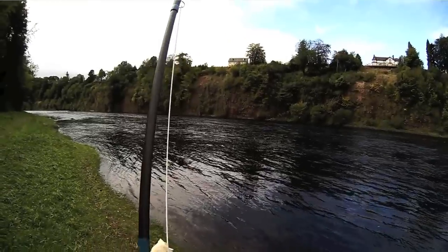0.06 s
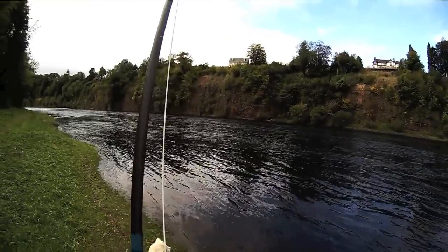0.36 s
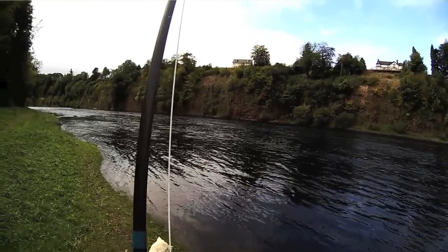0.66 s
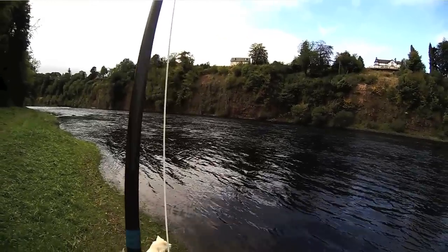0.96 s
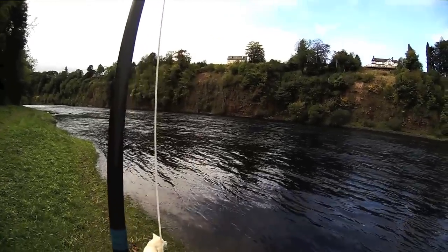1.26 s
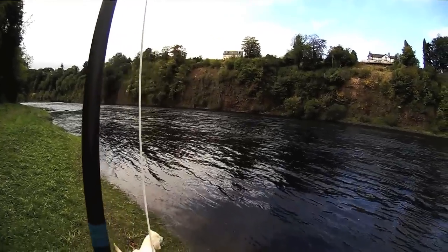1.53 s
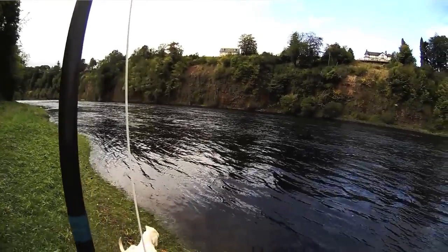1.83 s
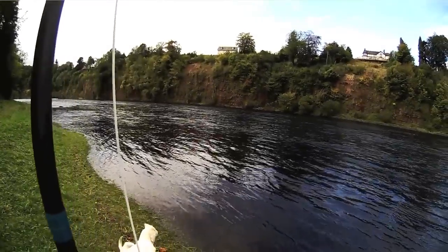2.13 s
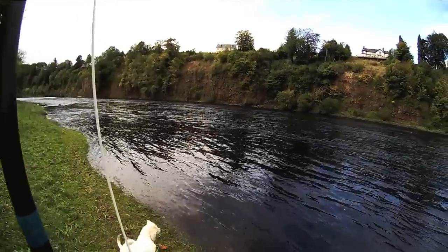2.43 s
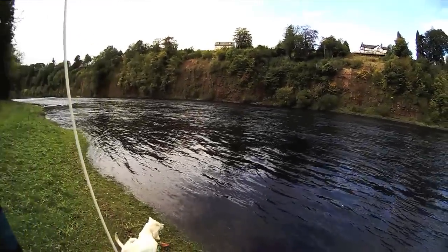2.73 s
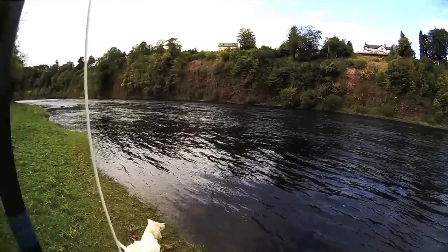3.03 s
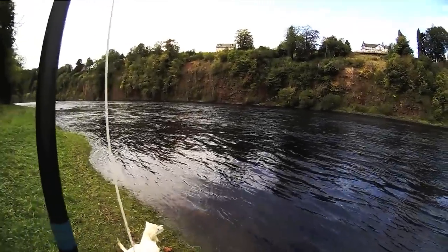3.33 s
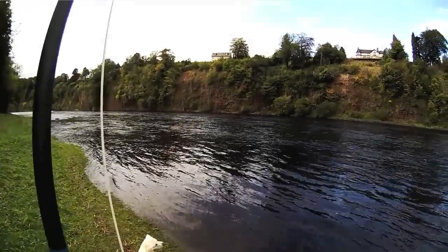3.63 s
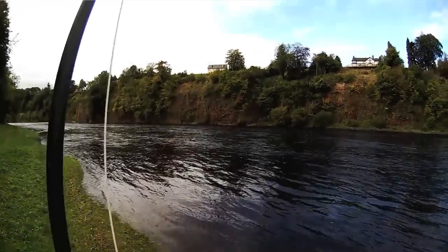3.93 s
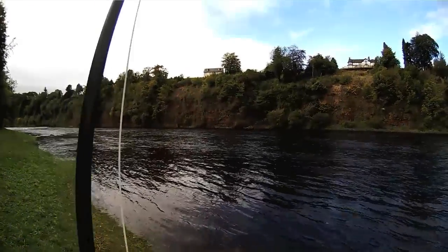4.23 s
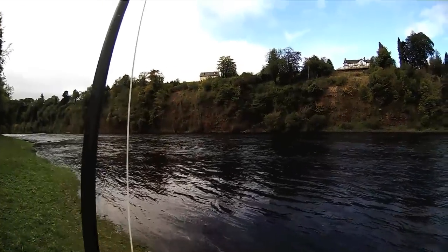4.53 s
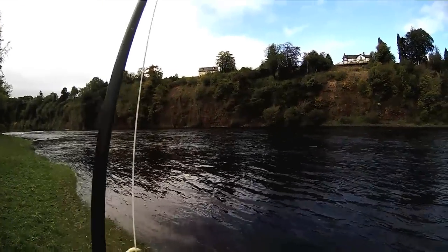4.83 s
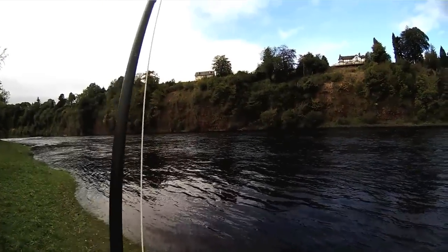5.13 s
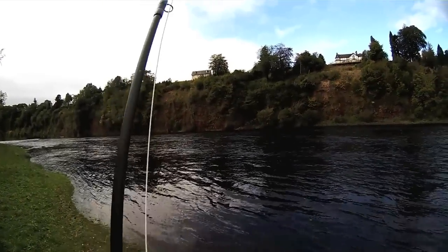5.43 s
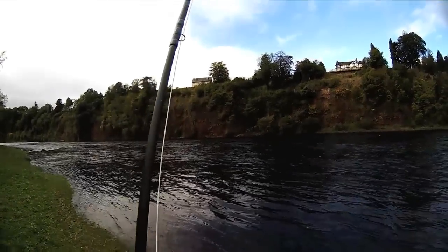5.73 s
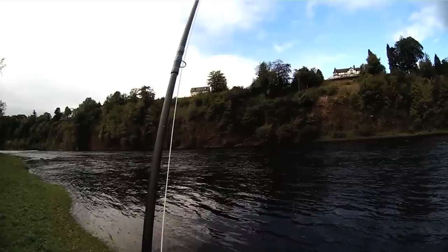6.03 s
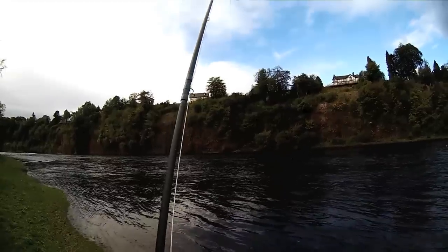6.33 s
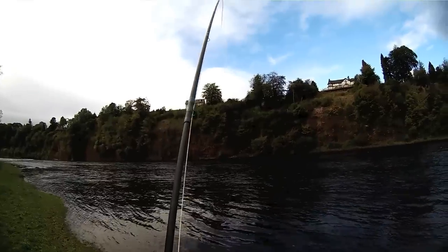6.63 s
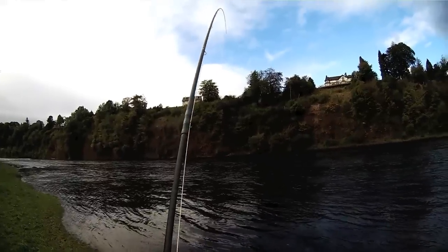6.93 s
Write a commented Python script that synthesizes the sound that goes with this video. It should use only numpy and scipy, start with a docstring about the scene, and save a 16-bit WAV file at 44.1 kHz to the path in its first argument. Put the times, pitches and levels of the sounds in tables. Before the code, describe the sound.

On an open riverbank, uneven gusts buffet the microphone with deep rumbles and thumps, growing heavier toward the end. Close by, a fishing reel is nudged and ticks now and then, before settling into a quick, regular winding with rasping gears, clicks and a thin high note. The current washes quietly behind throughout, with a single bubble and a barely audible distant bird near the start.

```python
"""A fishing reel is wound beside a wide river, starting slowly and settling to a steady pace.
Its gears whirr and rasp once a turn, its pawl (a small catch) clicks, and it sings one thin note.
Swirls of wind rumble, flutter and thump on the microphone, and the strongest overload it.
Behind them the water washes evenly, one bubble plops and a far bird whistles three times."""
import sys
import numpy as np
from scipy import signal
from scipy.fft import rfft, irfft, next_fast_len
from scipy.io import wavfile
from scipy.ndimage import uniform_filter1d

SR = 44100
rng = np.random.default_rng(int(sys.argv[2]) if len(sys.argv) > 2 else 0)


def materialize(psi):
    """Save the field psi as 16-bit PCM at rate SR to the path in sys.argv[1].

    A 1-D psi becomes a single channel; in a 2-D psi each row is a channel.
    """
    bounded = np.clip(np.atleast_2d(psi).T, -1, 1)
    quanta = np.round(bounded * 32767).astype(np.int16)
    wavfile.write(sys.argv[1], SR, quanta)


N = 312228
TIME = np.arange(N) / SR

# Table levels are relative: the functions may add their own gain.
# how loud the reel is: (time [s], rasp [dB], whirr [dB], singing [dB])
REEL_LEVELS = [(0, -60, -74.5, -99.5), (2.9, -55, -91.5, -95.5), (3.3, -53.5, -68.5, -82),
               (3.62, -49, -62.5, -67.5), (4.3, -50.5, -60, -67), (4.75, -48.5, -59.5, -70),
               (4.98, -56.5, -62, -69), (6.1, -52.5, -60, -81), (7.08, -56.5, -58.5, -77)]
# small nudges of the handle before the winding: (time [s], rasp [dB], half length [s])
HANDLE_NUDGES = [(.14, -63, 0.035), (.36, -59, 0.045), (0.982, -61, 0.074), (2.756, -57, 0.017),
                 (3.055, -57, 0.046), (3.176, -56.5, 0.037)]
# tone of the rubbing gears and of the running gears: (frequency [Hz], level [dB])
RASP_SPECTRUM = [(500, -20.5), (1500, -7.5), (2000, -4.5), (3000, -16.5), (4500, -14), (5800, -7),
                 (6500, -6), (8000, -8.5), (10000, -45)]
WHIRR_SPECTRUM = [(300, -8), (900, -3.5), (1400, 0), (1750, -0.5), (2030, 1.5), (2400, -7), (3300, -11.5),
                  (5000, -16), (8000, -8.5), (10000, -53)]
# the main pawl clicks: (time [s], click [dB], knock on the housing [dB])
PAWL_CLICKS = [(1.1497, -35.5, -64), (1.249, -50, -50.5), (1.3543, -33, -55), (1.5458, -32.5, -68),
               (1.5947, -36, -71), (2.2175, -25, -55), (2.662, -30, -64), (3.1183, -28.5, -64),
               (3.492, -28.5, -65), (3.919, -44, -45), (4.05, -28, -43.5), (4.2364, -30.5, -67),
               (4.2858, -31, -55), (4.3145, -24, -60), (4.503, -36, -44), (4.7097, -31, -54),
               (4.7618, -30, -53), (4.935, -31.5, -54), (4.992, -23.5, -51), (5.158, -31.5, -46),
               (5.204, -23.5, -60), (5.3162, -31.5, -63), (5.3828, -32, -45), (5.5798, -29.5, -61),
               (5.6152, -26.5, -48), (5.772, -28.5, -75), (5.823, -24.5, -42), (5.8485, -29, -56),
               (6.051, -22.5, -47), (6.2092, -33, -53), (6.2313, -25, -44), (6.255, -32, -45),
               (6.2724, -41, -48), (6.4397, -28, -58), (6.4633, -30.5, -43), (6.4923, -25, -54),
               (6.6651, -26, -50), (6.6955, -31, -46), (6.8758, -24, -45.5), (6.9226, -27.5, -51),
               (6.9395, -29, -57)]
# how the reel's housing rings when struck: (frequency [Hz], level [dB], decay time [s])
HOUSING_RINGS = [(1420, 1, 0.0012), (2030, -8.5, 0.0012), (2670, -1.5, 0.0011), (3180, 0.5, 0.00064),
                 (4870, 2, 0.00026)]
# the breeze under the gusts: (time [s], rumble [dB])
BREEZE_LEVELS = [(0, -28), (.42, -34.5), (.52, -44), (.77, -39), (1.22, -36.5), (1.4, -23.5), (1.82, -32.5),
                 (2.05, -25), (2.5, -24.5), (2.66, -30.5), (3.05, -24), (3.5, -29), (3.62, -22.5),
                 (4.45, -17), (5.1, -18.5), (5.32, -23.5), (5.9, -19), (7.08, -15.5)]
# a stronger breeze flutters more: (rumble [dB], flutter [dB])
FLUTTER_BY_RUMBLE = [(-45.5, -58), (-28.5, -43.5), (-16.5, -26.5)]
# gusts: (start [s], length [s], rumble [dB], flutter [dB])
WIND_GUSTS = [(0, 0.039, -23, -40), (0.251, 0.13, -27, -47), (1.347, .18, -24, -36),
              (1.607, 0.064, -20, -32), (1.915, .27, -23, -27), (2.364, 0.099, -32.5, -33),
              (2.831, .16, -17.5, -20), (3.563, 0.077, -31, -31.5), (4.327, 0.028, -13, -23),
              (4.433, 0.036, -13, -27), (4.858, 0.092, -16.5, -18), (5.154, 0.083, -28, -22.5),
              (5.353, 0.14, -24.5, -30.5), (5.808, .125, -12.5, -19.5), (5.969, 0.18, -15, -21.5),
              (6.179, 0.11, -21, -24.5), (6.31, .16, -14, -18.5), (6.507, 0.026, -31, -21.5),
              (6.669, 0.042, -17, -18), (6.782, 0.055, -23, -24), (6.936, 0.12, -25.5, -17.5)]
# tone of the three parts of the wind: (frequency [Hz], level [dB])
RUMBLE_SPECTRUM = [(8, -24.5), (20, -6.5), (35, 0.5), (85, 0), (140, -1.3), (200, -8.5), (300, -36.5),
                   (600, -53.5), (1500, -100)]
FLUTTER_SPECTRUM = [(70, -26.5), (150, -5), (220, 0.5), (290, -4.5), (400, -18), (600, -33), (1200, -62),
                    (3000, -100)]
TEARING_SPECTRUM = [(150, -21.5), (330, 1.5), (480, -4.5), (700, -9), (1000, -20), (2000, -38),
                    (5000, -66.5)]
# the hardest swirls of air to hit the microphone: (time [s], level [dB], pitch [Hz])
WIND_THUMPS = [(0.019, -13, 125), (.362, -18.5, 125), (1.944, -10.5, 153), (2.853, -8, 261),
               (2.93, -18.5, 279), (2.978, -7, 210), (3.244, -11, 115), (3.997, -7, 188),
               (4.836, -13.5, 280), (4.862, -5.5, 258), (4.879, -1.5, 229), (4.919, -3, 250),
               (5.184, -6.5, 240), (5.258, -12, 303), (5.471, -3.5, 105), (5.867, -7.5, 262),
               (5.928, -2.5, 218), (5.981, -12, 282), (6.111, -4.5, 228), (6.415, 0, 183), (6.954, -9, 286),
               (7.007, -6, 280)]
# tone of the flowing water: (frequency [Hz], level [dB])
RIVER_SPECTRUM = [(60, -8.5), (250, -5), (450, 2), (700, -0.5), (1000, -3), (1500, -8.5), (2000, -11.5),
                  (3000, -18), (5000, -26), (8000, -25.5)]
# bird calls: (time [s], level [dB])
BIRD_CALLS = [(.07, -63), (.745, -56), (1.775, -56)]
# tone of the microphone in its case, with a deep dip near 4 kHz: (frequency [Hz], gain [dB])
MICROPHONE_TONE = [(20, 0.5), (2000, -1), (2500, -6), (3000, -9.5), (3700, -15), (4020, -22.5),
                   (4350, -12.5), (5050, -0.5), (5700, -0.5), (6500, 4.5), (7250, -4), (7650, -14.5),
                   (8100, -29)]

FIRST_TURN_S = 3.385


def handle_turns(count=17, turn_s=.2145, lag_s=.042, spin_up_turns=1.5, rub_s=0.016, first_rub_s=.052):
    """The handle speeds up. Lists each turn's tight spot: (time [s], rasp [dB], half length [s])."""
    slowness = np.exp(-np.arange(count) / spin_up_turns)
    periods = turn_s + lag_s * slowness
    times = FIRST_TURN_S + np.cumsum(periods) - periods
    rasp_db = np.interp(times, TIME, curves(REEL_LEVELS)[0])
    return list(zip(times, rasp_db, rub_s + (first_rub_s - rub_s) * slowness))


def gear_rasp(ticks_per_s=2400):
    """The gears rub at each nudge and once a turn: a swell of tiny ticks."""
    rubs = HANDLE_NUDGES + handle_turns()
    power = sum(amp(db) ** 2 * np.exp(-((TIME - s) / half_s) ** 2) for s, db, half_s in rubs)
    return np.sqrt(power) * unit(colour(ticks(ticks_per_s), RASP_SPECTRUM))


def gear_whirr(gain_db=6.5, flicker_db=3.5):
    """The running gears make a flickering whirr."""
    whirr_db = curves(REEL_LEVELS)[1]
    return amp(whirr_db + gain_db + flicker_db * drift(40)) * noise(WHIRR_SPECTRUM)


def reel_singing(gain_db=6.0, hz=7255, waver_hz=35, flicker_db=2.5):
    """The running reel sings on one thin, unsteady note."""
    note_db = curves(REEL_LEVELS)[2]
    phase = 2 * np.pi * np.cumsum(hz + waver_hz * drift(150)) / SR
    return amp(note_db + gain_db + flicker_db * drift(60)) * np.sin(phase)


def light_clicks(per_turn=2, click_db=-34, knock_db=-56.5, spread_db=6.5, scatter_s=.026):
    """Weak clicks near each tight spot from the fourth turn on, listed like PAWL_CLICKS."""
    spots = np.repeat([s for s, _, _ in handle_turns()[3:]], per_turn)
    when, click, knock = rng.standard_normal((len(spots), 3)).T
    return list(zip(spots + scatter_s * when, click_db + spread_db * click, knock_db + spread_db * knock))


def stray_clicks(count=10, click_db=-37.5, knock_db=-66, spread_db=2, from_s=2.2):
    """Faint clicks as the line pulls before the winding, listed like PAWL_CLICKS."""
    return [(rng.uniform(from_s, FIRST_TURN_S), click_db + spread_db * rng.standard_normal(), knock_db)
            for _ in range(count)]


def pawl(gain_db=2, knock_gain_db=7, pitch_hz=6420, ring_s=0.00012, rebound_s=.0012, rattle_s=0.0035):
    """The pawl catches, snaps home and bounces twice; each touch knocks the housing."""
    out, t = np.zeros(N), np.arange(900) / SR
    housing = sum(amp(db) * np.sin(2 * np.pi * hz * t) * np.exp(-t / decay_s)
                  for hz, db, decay_s in HOUSING_RINGS)
    touches_db = [-4, 0, -7, -14]  # catch, snap, bounce, bounce
    for s, click_db, knock_db in PAWL_CLICKS + light_clicks() + stray_clicks():
        hz = pitch_hz * (1 + 0.079 * rng.standard_normal())
        ring = np.sin(2 * np.pi * hz * t) * np.exp(-t / ring_s)
        gaps = rebound_s * np.exp(0.17 * rng.standard_normal(len(touches_db)))
        for delay, touch_db in zip(np.cumsum(gaps) - gaps[0], touches_db):
            rattle = amp(-24) * rng.standard_normal(len(t)) * np.exp(-t / rattle_s)
            snap = amp(click_db + gain_db) * (ring + rattle) + amp(knock_db + knock_gain_db) * housing
            add(out, s + delay, amp(touch_db) * snap)
    return out


def swirls(spectrum, puffs_db):
    """Swirling air comes in quick puffs, but keeps its strength over a gust."""
    flow = colour(rng.standard_normal(N) * amp(puffs_db), spectrum)
    power = uniform_filter1d(uniform_filter1d(flow ** 2, size=3200), size=2200)
    return flow / np.sqrt(np.abs(power) + 1e-12)


def wind(waver_db=2.0, rise_s=.012, fall_s=0.024, tearing_growth=1.4):
    """Gusts ride on a breeze. Big swirls rumble, small ones flutter, hard gusts add a tearing sound."""
    breeze_db = curves(BREEZE_LEVELS)[0] + waver_db * drift(9)
    big_power = amp(breeze_db) ** 2
    small_power = amp(np.interp(breeze_db, *np.transpose(FLUTTER_BY_RUMBLE))) ** 2
    for s, length, rumble_db, flutter_db in WIND_GUSTS:
        shape = np.interp(TIME - s, [-rise_s, 0, length, length + fall_s], [0, 1, 1, 0]) ** 2
        big_power += amp(rumble_db) ** 2 * shape
        small_power += amp(flutter_db) ** 2 * shape
    big_db, small_db = 10 * np.log10(big_power), 10 * np.log10(small_power)
    # a light breeze comes in separate puffs; in stronger wind they run together
    puff_depth_db = np.interp(uniform_filter1d(big_db, size=20000), [-27, -19], [6, 3])
    puffs_db = puff_depth_db * drift(67)
    rumble = amp(big_db - 1) * swirls(RUMBLE_SPECTRUM, puffs_db)
    flutter = amp(small_db) * swirls(FLUTTER_SPECTRUM, puffs_db)
    tearing = amp(-39 + tearing_growth * (small_db + 22)) * swirls(TEARING_SPECTRUM, puffs_db)
    return rumble + flutter + tearing


def wind_thumps(gain_db=-3, tear_gain_db=-22, tear_s=0.0028):
    """A passing swirl sucks, then pushes, and tears briefly at the microphone's opening."""
    thumps, tears, t = np.zeros(N), np.zeros(N), np.arange(-800, 800) / SR
    for s, db, hz in WIND_THUMPS:
        phase = 2 * np.pi * hz * t
        add(thumps, s + t[0], amp(db + gain_db) * phase * np.exp((1 - phase ** 2) / 2))
        add(tears, s + t[0], amp(db + tear_gain_db) * np.exp(-(t / tear_s) ** 2))
    return thumps + tears * noise(TEARING_SPECTRUM)


def river(wash_db=-44.5, ripple_db=0.53, fizz_db=-67, bubbles_per_s=300):
    """The broad wash of the current, with a fizz of small bursting bubbles."""
    wash = noise(RIVER_SPECTRUM) * amp(ripple_db * drift(8.2))
    return amp(wash_db) * wash + amp(fizz_db) * unit(ticks(bubbles_per_s))


def bubble_plop(start_s=0.64, gain_db=-39, hz=1020, rise_per_s=6, decay_s=0.017):
    """One bubble near the bank: its note rises as it surfaces."""
    out, t = np.zeros(N), np.arange(3000) / SR
    swell = np.tanh(t / 0.0027) * np.exp(-t / decay_s)
    phase = 2 * np.pi * np.cumsum(hz * (1 + rise_per_s * t)) / SR
    add(out, start_s, amp(gain_db) * swell * np.sin(phase))
    return out


def bird(start_hz=3150, end_hz=2520, length_s=.05, waver=0.018):
    """Short falling whistles from far across the water."""
    out, t = np.zeros(N), np.arange(0, length_s, 1 / SR)
    swell = np.sin(np.pi * t / length_s)
    for s, db in BIRD_CALLS:
        hz = np.geomspace(start_hz, end_hz, len(t)) * (1 + waver * drift(200)[:len(t)])
        add(out, s, amp(db) * swell * np.sin(2 * np.pi * np.cumsum(hz) / SR))
    return out


def amp(db):
    """Turns decibels into a gain."""
    return 10 ** (np.asarray(db) / 20)


def unit(x):
    """Scales a signal to an average power of 1."""
    return x / np.sqrt(np.mean(x ** 2) + 1e-20)


def curves(rows):
    """Joins a table's points with straight lines in time, one curve per level column."""
    times, *columns = np.transpose(rows)
    return [np.interp(TIME, times, column) for column in columns]


def colour(x, spectrum):
    """Turns each frequency up or down as the spectrum says."""
    hz, db = np.transpose(spectrum)
    size = next_fast_len(N + 4096)
    bins = np.fft.rfftfreq(size, 1 / SR)
    gain = amp(np.interp(np.log(bins + 1), np.log(hz), db))
    return irfft(rfft(x, size) * gain, size)[:N]


def noise(spectrum):
    """Steady noise with the given tone."""
    return unit(colour(rng.standard_normal(N), spectrum))


def ticks(per_s):
    """Tiny ticks of random size at random moments."""
    return rng.standard_normal(N) * (rng.random(N) < per_s / SR)


def drift(rate):
    """A smooth random wobble that changes about rate times a second."""
    bins = np.fft.rfftfreq(N, 1 / SR)
    return unit(irfft(rfft(rng.standard_normal(N)) * np.exp(-(bins / rate) ** 2), N))


def add(mix, s, sound):
    """Mixes a sound in at s seconds."""
    part = mix[max(round(s * SR), 0):][:len(sound)]
    part += sound[:len(part)]


def scene():
    """The reel, wind, water and bird in open air, with no echoes."""
    reel = gear_rasp() + gear_whirr() + reel_singing() + pawl()
    return (reel + wind() + wind_thumps() + river() + bubble_plop() + bird())[None]


def record(dry, ceiling=.71, cutoff_hz=8050):
    """The microphone squashes the strongest gusts, colours the sound and cuts the highest treble."""
    squashed = dry[0] / (1 + (dry[0] / ceiling) ** 10) ** (1 / 10)
    faded = squashed * signal.windows.tukey(N, .001)
    low_pass = signal.firwin(511, cutoff_hz, window=("kaiser", 9), fs=SR)
    return signal.oaconvolve(colour(faded, MICROPHONE_TONE), low_pass, "same")[None]


dry = scene()
out = record(dry)
materialize(out)
```